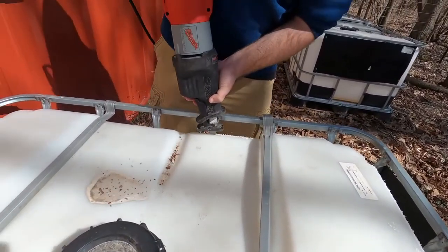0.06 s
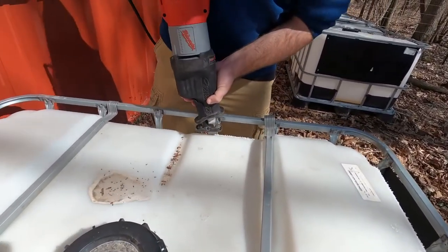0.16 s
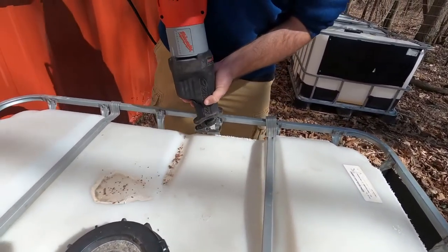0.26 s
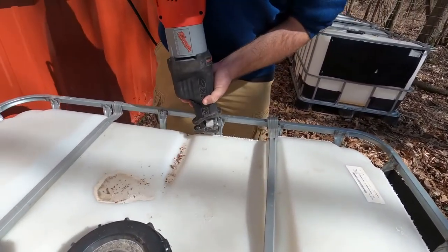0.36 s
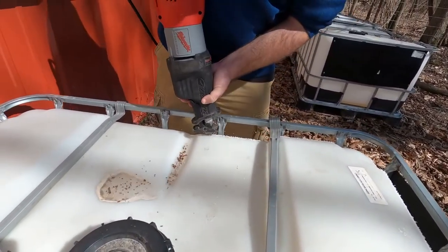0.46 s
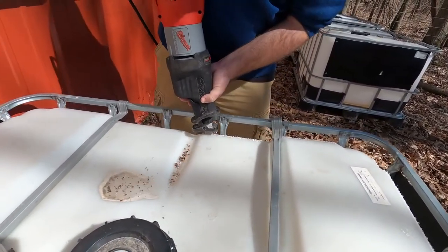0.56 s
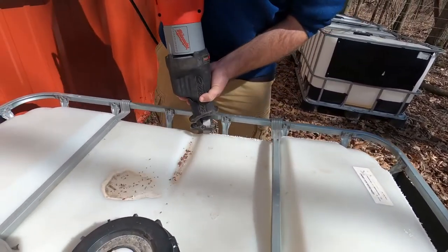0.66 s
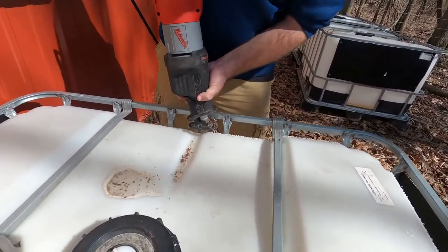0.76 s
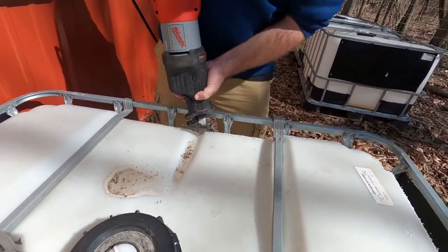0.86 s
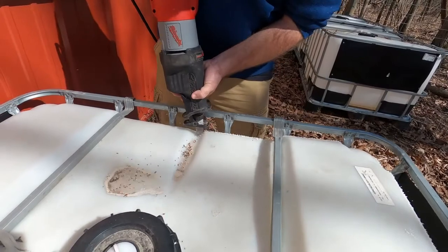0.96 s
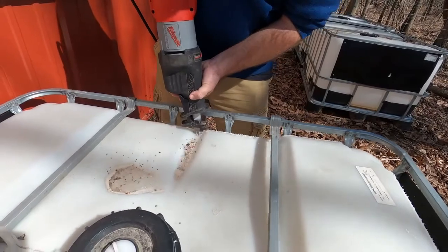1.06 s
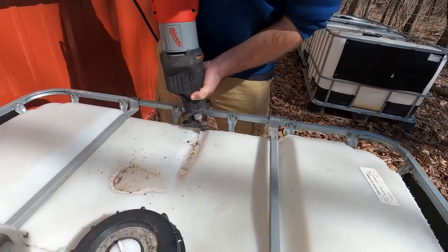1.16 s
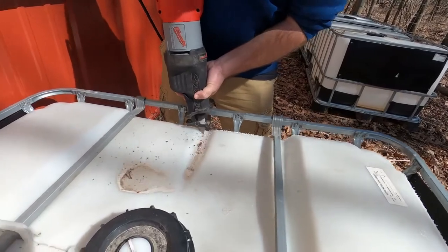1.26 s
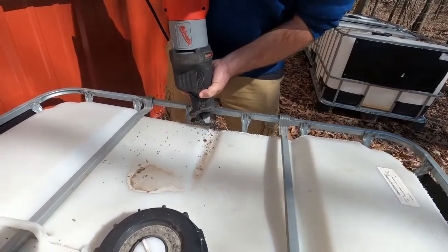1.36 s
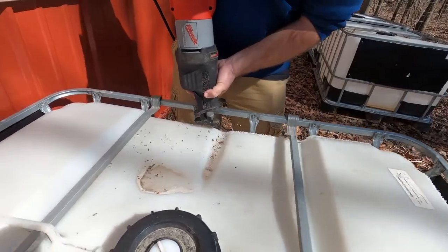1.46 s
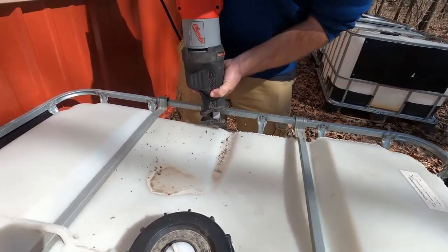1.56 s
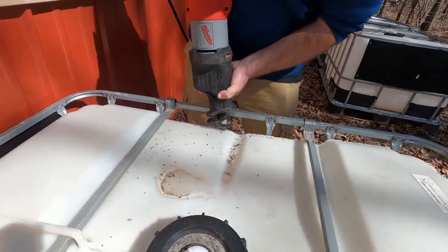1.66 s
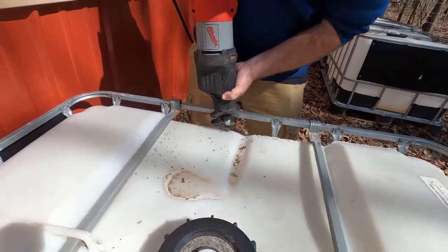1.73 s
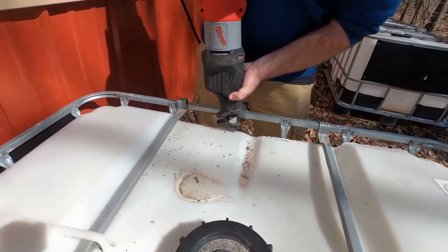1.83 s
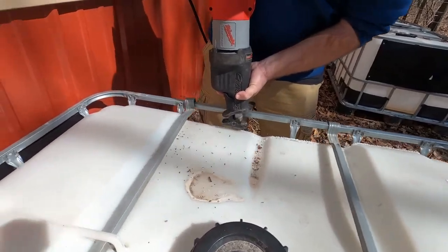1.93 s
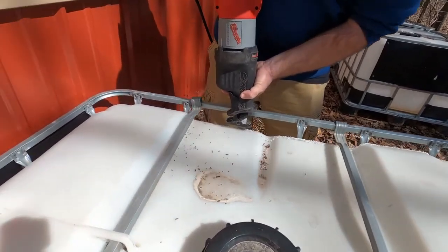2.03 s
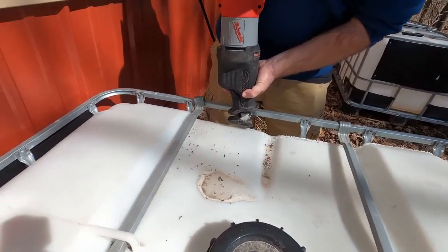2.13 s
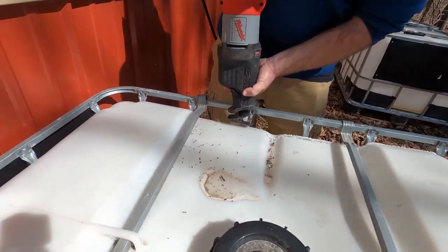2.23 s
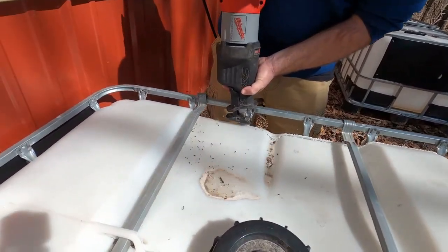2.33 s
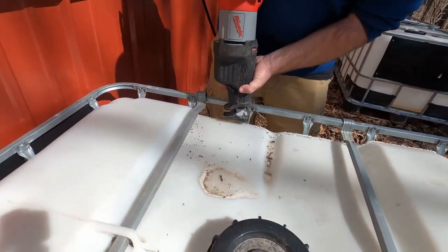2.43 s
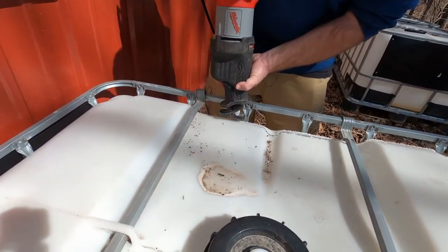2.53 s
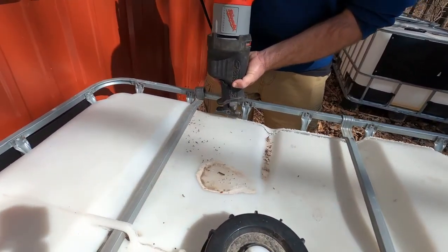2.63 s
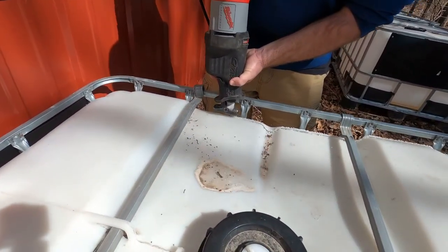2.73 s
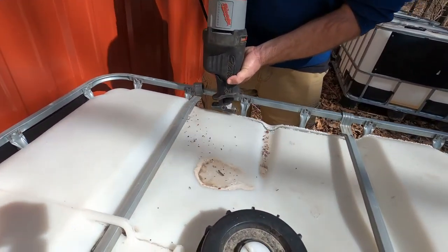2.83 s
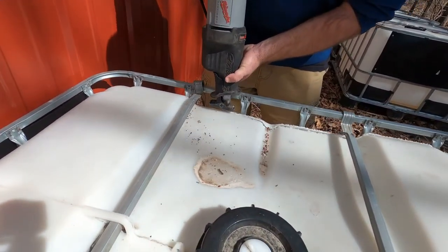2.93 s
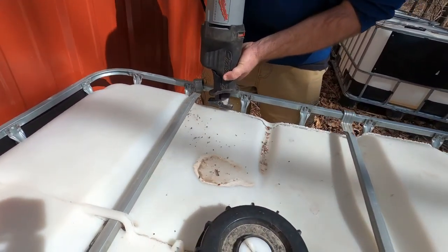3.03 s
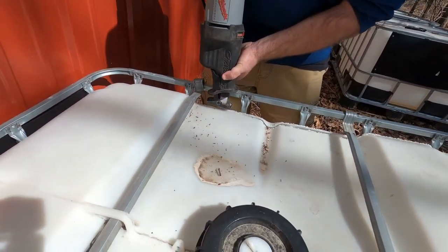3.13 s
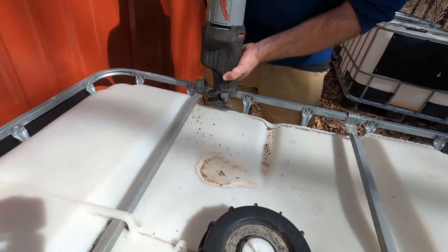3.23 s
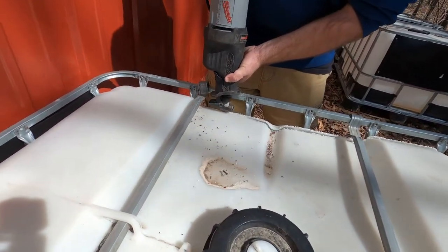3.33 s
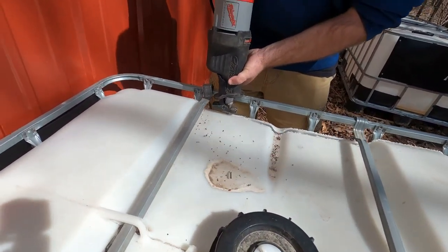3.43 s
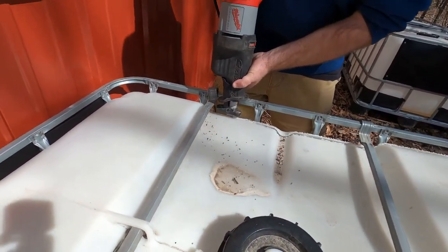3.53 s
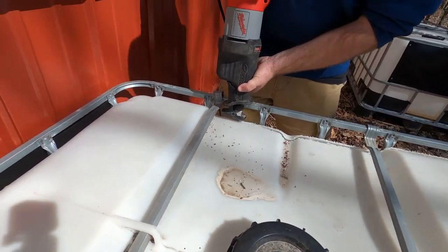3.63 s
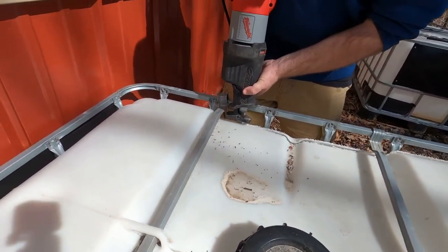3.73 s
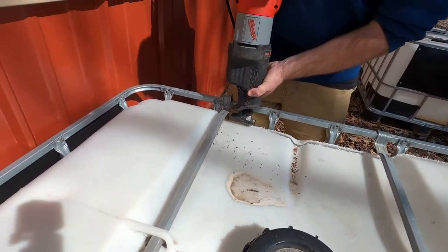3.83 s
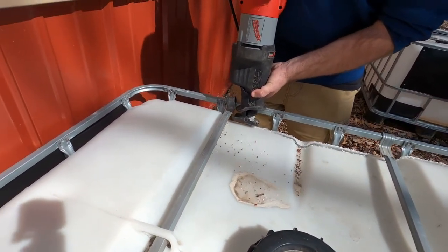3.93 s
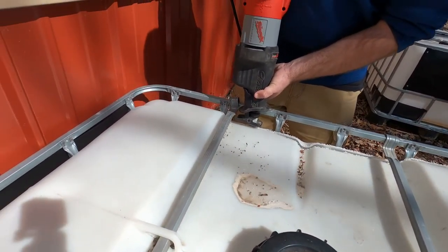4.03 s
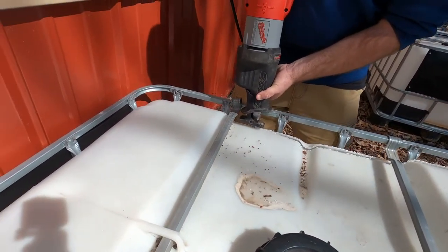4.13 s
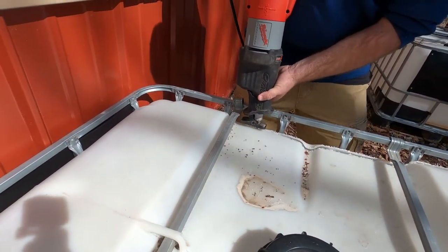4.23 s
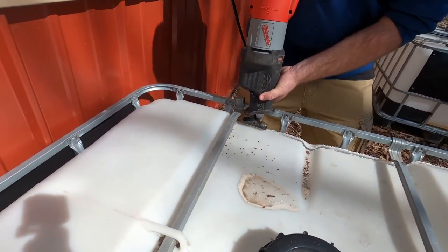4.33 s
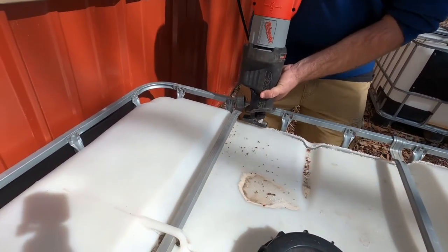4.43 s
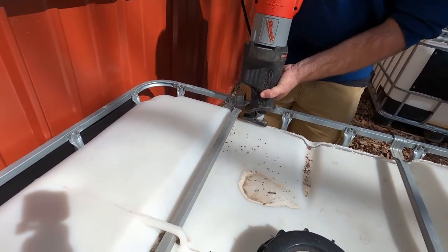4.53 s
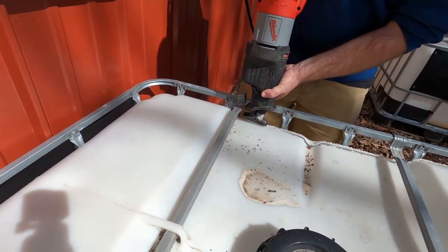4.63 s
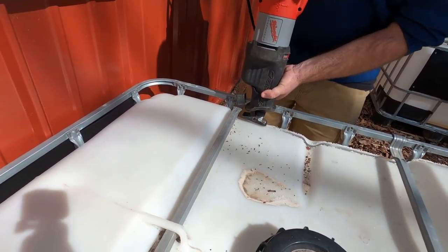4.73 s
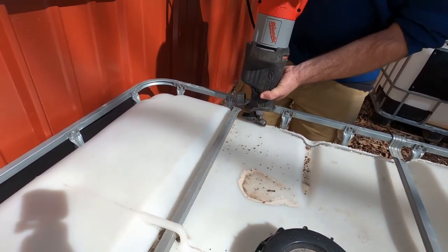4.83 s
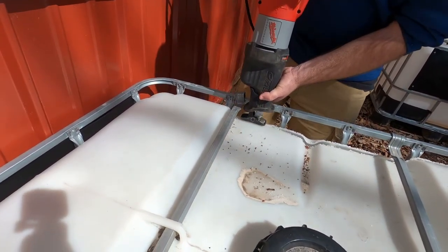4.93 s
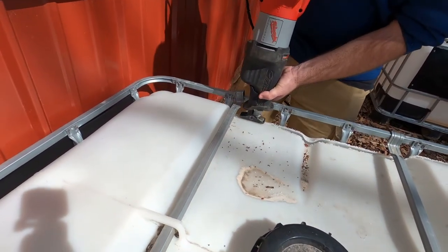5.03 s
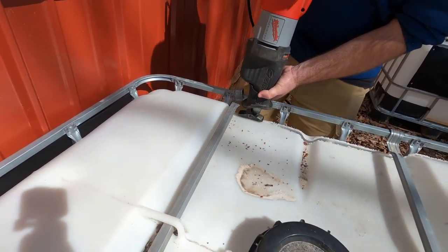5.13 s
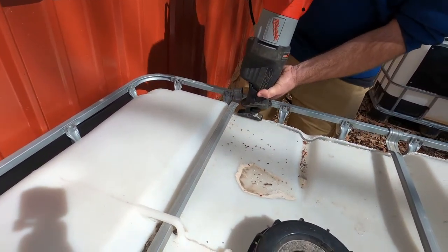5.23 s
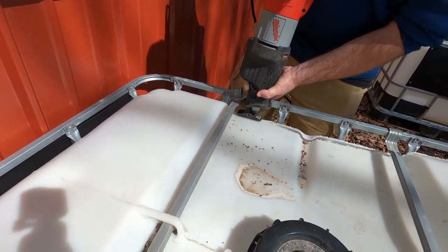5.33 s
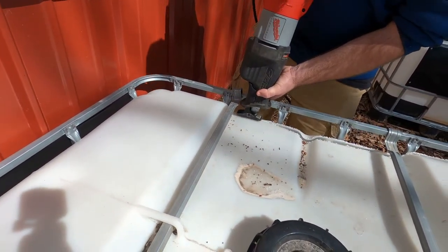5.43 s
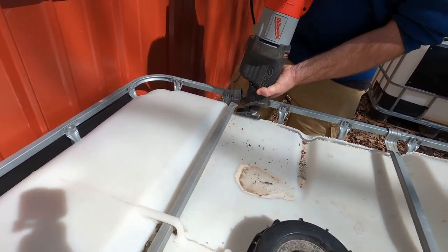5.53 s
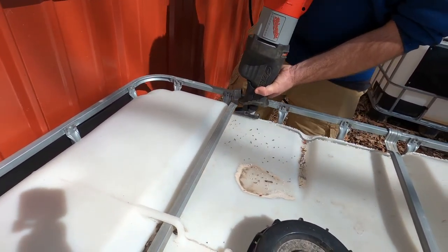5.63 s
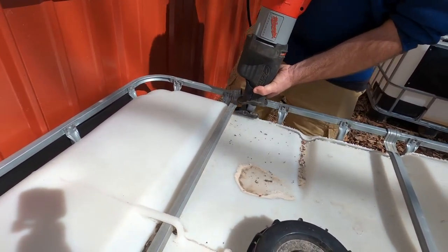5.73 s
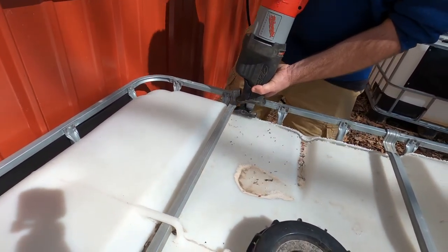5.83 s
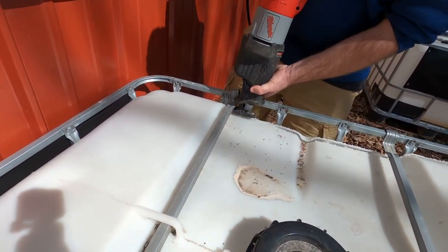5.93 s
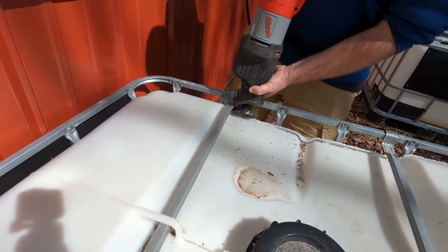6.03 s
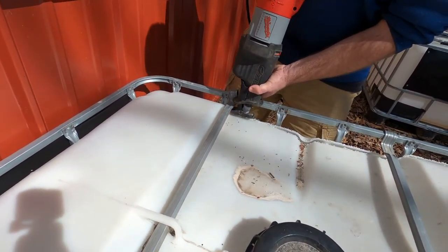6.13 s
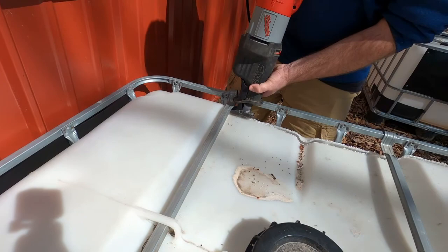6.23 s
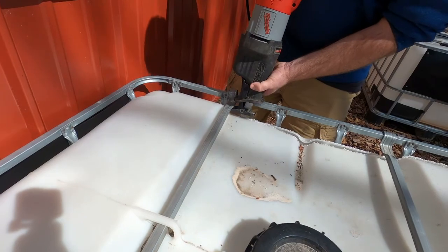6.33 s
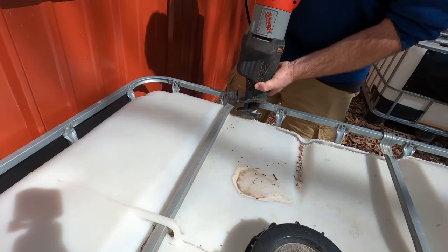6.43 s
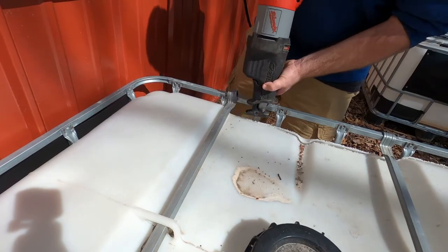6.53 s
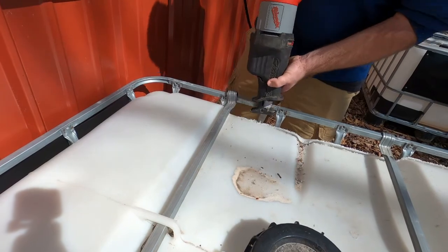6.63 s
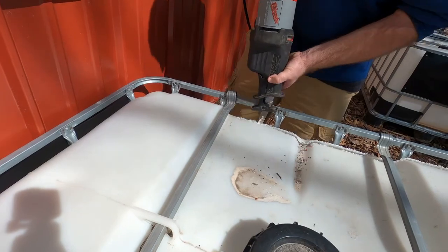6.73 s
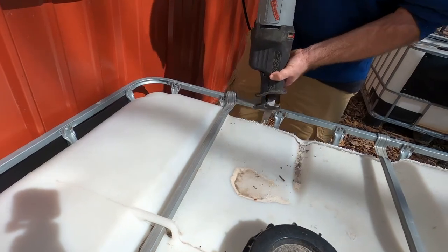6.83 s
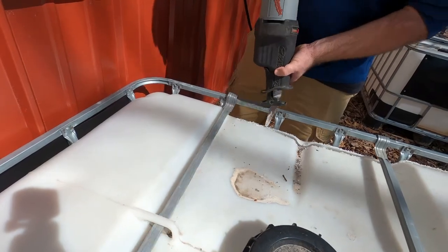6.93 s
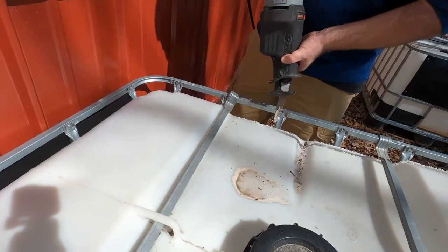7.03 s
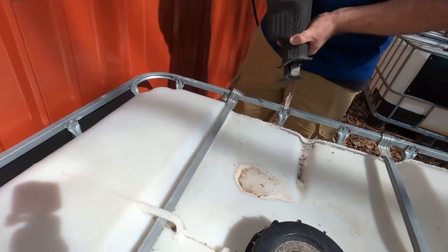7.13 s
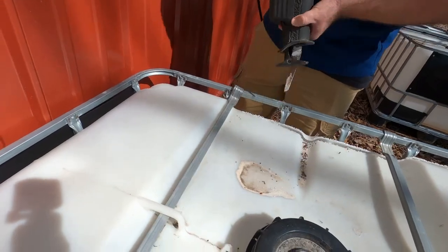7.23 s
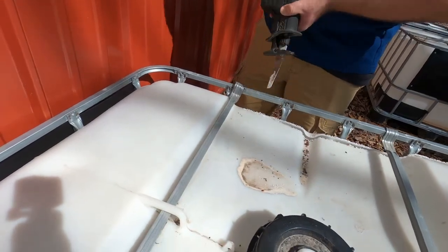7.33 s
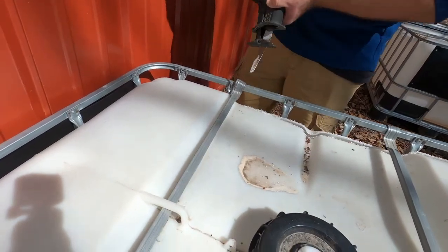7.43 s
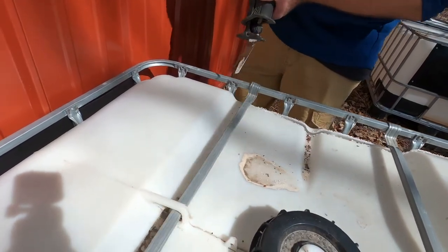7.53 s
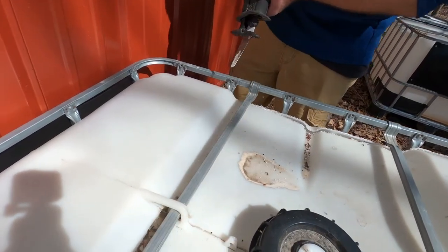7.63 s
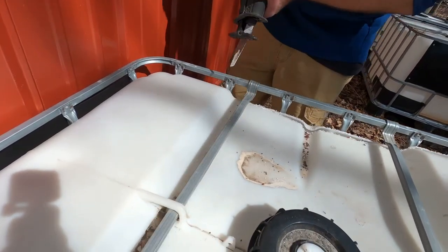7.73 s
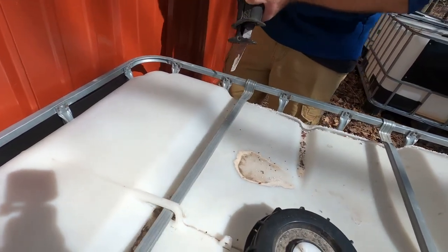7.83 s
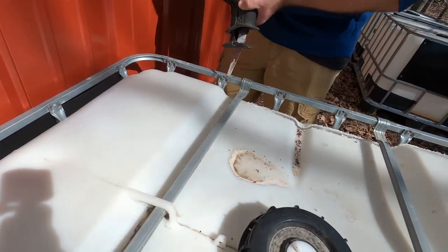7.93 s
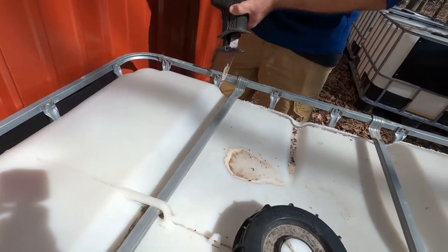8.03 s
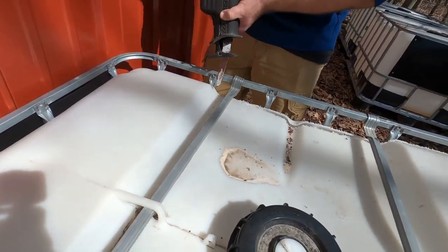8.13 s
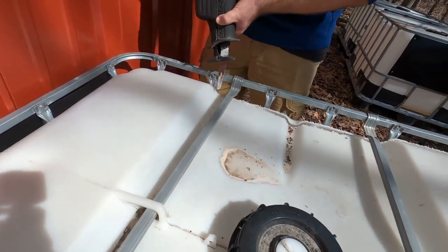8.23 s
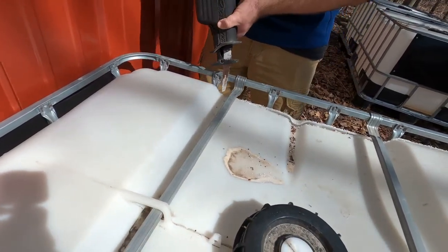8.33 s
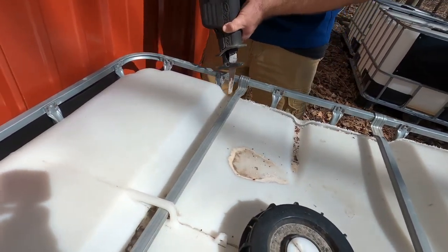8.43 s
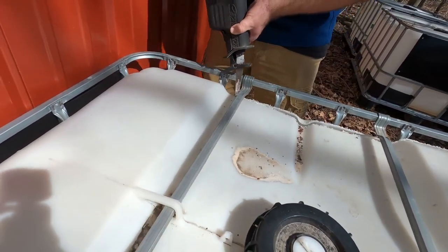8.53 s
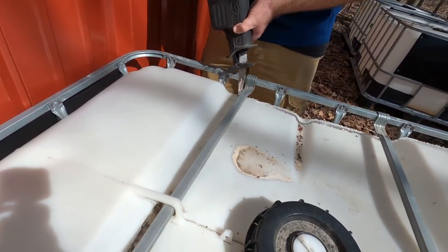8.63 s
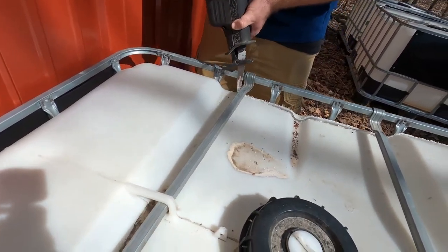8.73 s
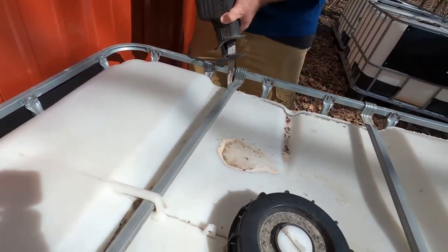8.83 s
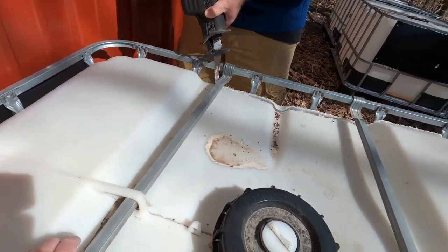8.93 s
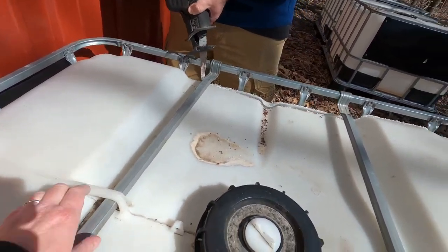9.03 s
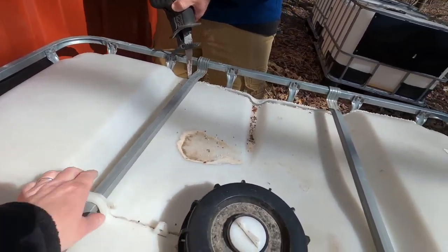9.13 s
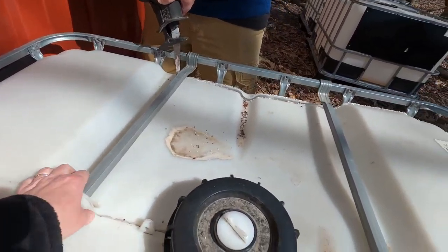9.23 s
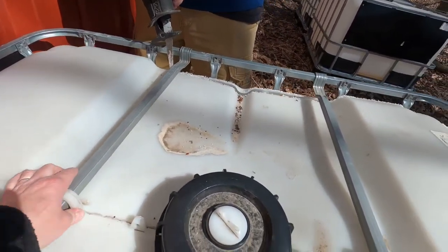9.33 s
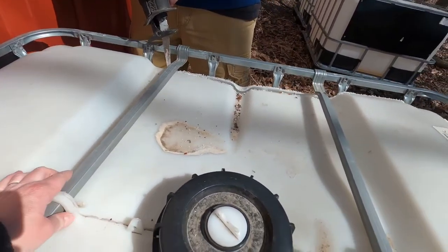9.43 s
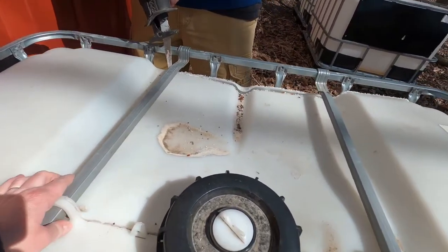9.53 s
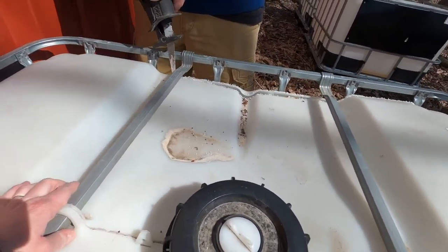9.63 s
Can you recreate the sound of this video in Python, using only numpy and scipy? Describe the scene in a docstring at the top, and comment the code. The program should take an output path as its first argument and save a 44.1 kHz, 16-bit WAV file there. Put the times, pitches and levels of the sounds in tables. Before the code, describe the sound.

An electric reciprocating saw cuts into a big hollow plastic tank outdoors, close by, with a fast rattling rasp, a booming drone and brief squeals. It winds down with a falling whine and slowing strokes, bursts back to speed briefly, then coasts to a stop. Afterwards the blade clinks against the steel cage, and the tank is bumped and rubbed more quietly.

```python
"""A corded reciprocating saw cuts the wall of a big hollow plastic tank in a steel cage, outdoors.
Each stroke is an impulsive excitation: it thumps the tank's modes and rips a burst of chips, while
the blade slaps, rings and squeals by stick-slip in the kerf. Two motor whines, proportional in
frequency to the stroke rate, fall as the saw coasts down twice. Afterwards the free blade taps
the cage, and the tank is shoved and rubbed by hand."""
import sys
import numpy as np
from scipy import signal
from scipy.fft import rfft, irfft
from scipy.io import wavfile
from scipy.ndimage import uniform_filter1d, map_coordinates

SR = 44100
rng = np.random.default_rng(int(sys.argv[2]) if len(sys.argv) > 2 else 0)


def dump_mix(stems):
    """Bounce the given channels to the path in sys.argv[1] as a 16-bit WAV at rate SR."""
    frames = np.atleast_2d(stems).T  # one column per channel
    limited = np.clip(frames, -1, 1)  # hard clip at full scale
    pcm = np.round(limited * 32767).astype(np.int16)
    wavfile.write(sys.argv[1], SR, pcm)


N = 426006
TIME = np.arange(N) / SR
FULL_SPEED = 44   # strokes/s; one stroke is one turn of the crank


def amp(db):
    """Amplitude ratio of a level in decibels."""
    return 10 ** (np.asarray(db) / 20)


def unit_rms(x):
    """Normalisation to unit rms."""
    return x / np.sqrt(np.mean(x ** 2) + 1e-20)


def in_time(rows):
    """Linear interpolation of each column against the first, t/s."""
    times, *columns = np.transpose(rows)
    return [np.interp(TIME, times, column) for column in columns]


def fade_in(centre_s, length_s):
    """Linear ramp from 0 to 1."""
    return np.clip((TIME - centre_s) / length_s + .5, 0, 1)


def drift(rate_hz):
    """Random modulation: straight lines between Gaussian values."""
    knots = rng.standard_normal(int(N / SR * 60) + 2)
    return np.interp(TIME * rate_hz, np.arange(len(knots)), knots)


def colour(x, spectrum):
    """Spectral shaping by rows of f/Hz, gain/dB."""
    hz = np.maximum(np.arange(N // 2 + 1) * SR / N, 1)
    knot_hz, knot_db = np.transpose(spectrum)
    return irfft(rfft(x) * amp(np.interp(np.log(hz), np.log(knot_hz), knot_db)), N)


def butter(x, order, hz, kind):
    """Butterworth filtering."""
    return signal.sosfilt(signal.butter(order, hz, kind, fs=SR, output="sos"), x)


def decay(impulses, t60):
    """Exponential decay after each impulse."""
    return signal.lfilter([1], [1, -amp(-60 / (t60 * SR))], impulses + 1e-18)


def ring(force, hz, t60):
    """Damped oscillator: a unit impulse starts a sine of amplitude 1."""
    r, w = amp(-60 / (t60 * SR)), 2 * np.pi * hz / SR
    return signal.lfilter([0, np.sin(w)], [1, -2 * r * np.cos(w), r * r], force + 1e-18)


def resonate(force, modes):
    """Modal superposition: a body responds as a sum of damped oscillators."""
    return sum(amp(db) * ring(force, hz, t60) for hz, t60, db in modes)


def passing(turns, places):
    """Phase crossings: the samples at which the crank passes a place in its turn, and which place."""
    slot = np.searchsorted(places, turns % 1) % len(places)
    at = np.flatnonzero(np.diff(slot)) + 1
    return at, slot[at - 1]


# Spectrum of the side signal: f/Hz, side re mid/dB
SIDE_SPECTRUM = [(40, -19.5), (180, -26), (700, -11), (2500, -7), (6000, -2)]

def widen(x):
    """Decorrelation: a randomly fluttering side signal of short echoes widens the treble most."""
    echoes = rng.standard_normal(400) * np.exp(-np.arange(400) / 160)
    side = signal.fftconvolve(x, echoes / np.sqrt(np.sum(echoes ** 2)))[:N] * unit_rms(drift(45))
    return x + colour(side, SIDE_SPECTRUM) * [[1], [-1]]


# Spectra of the hollow tank and of rubbed plastic: f/Hz, level/dB
RUMBLE_SPECTRUM = [(25, 8.5), (172, -2.5), (321, -22), (880, -120)]
RUB_SPECTRUM = [(240, -34), (400, -7.5), (1010, -15.5), (4520, -21), (14000, -43.5)]
# Shoves on the tank: t/s, rumble level/dB, rubbing level/dB
SHOVES = [(7.64, -14.5, -39), (7.91, -21.5, -45.5), (7.96, -21, -47.5), (8.16, -27.5, -42),
          (8.377, -20.5, -38.5), (8.63, -20.5, -41.5), (8.776, -17, -41.5), (8.91, -20.5, -67),
          (9.18, -29.5, -55), (9.31, -26, -50.5)]

def handling():
    """Forced vibration and friction noise: shoves boom in the tank, hands and clothes rub on it."""
    rumble_db, rub_db = -35, -55   # hands at rest
    for s, shove_db, rubbing_db in SHOVES:
        swell_db = np.minimum(361 * (TIME - s), -84 * (TIME - s))   # rise and fall in dB/s
        rumble_db = np.maximum(rumble_db, shove_db + swell_db)
        rub_db = np.maximum(rub_db, rubbing_db + swell_db)
    rumble = unit_rms(colour(rng.standard_normal(N), RUMBLE_SPECTRUM))
    grit = rng.standard_normal(N) * amp(2.3 * np.minimum(rng.exponential(1, N), 4) + 4.1 * drift(40))
    return amp(rumble_db) * rumble + amp(rub_db) * unit_rms(colour(grit, RUB_SPECTRUM))


# Modes of the steel bars and blade: f/Hz, level/dB, T60/s
STEEL_MODES = [(2004, -6, 0.11), (2654, -8.5, 0.15), (3010, -6, 0.063), (3690, -2, 0.16),
               (4830, -8.5, 0.098), (5240, -5.5, 0.048)]
# Taps: t/s, tap level/dB, knock level/dB, share of steel/1
TAPS = [(7.0377, -12.5, -26, 0.7), (7.137, -11.5, -17.5, 1), (7.6178, -14, -45, 0.97),
        (7.6341, -24, -16, 0.55), (7.9512, -25, -15, 0.75), (8.1517, -33.5, -36, 0.85),
        (8.3268, -17.5, -44, 0.94), (8.383, -32.5, -35, 0), (8.6053, -24, -35, 0.83),
        (8.772, -26.5, -15.5, 0.16), (8.808, -26, -21, 1), (9.166, -43.5, -40, 0.1)]

def taps():
    """Impact excitation: each tap is a brief rattle that rings steel, scuffs plastic, knocks the tank."""
    s, tap_db, knock_db, steel = np.transpose(TAPS)

    def blows(heights):
        """One impulse per tap."""
        force = np.zeros(N)
        force[np.round(s * SR).astype(int)] = heights
        return force

    scatter_db = rng.normal(0, 5, (len(s), len(STEEL_MODES)))
    rattle = rng.standard_normal(N)
    ringing = 0
    for k, (hz, db, t60) in enumerate(STEEL_MODES):
        contact = decay(blows(steel * amp(tap_db + db - 32.5 + scatter_db[:, k])), t60=.056)
        ringing += ring(rattle * contact, hz, t60)
    crack = rattle * decay(blows(steel * amp(tap_db - 11)), t60=.059)   # steel on steel
    crack = butter(crack, 2, [600, 5000], "band")
    scuff = butter(colour(rattle * amp(5.5 * drift(59)), RUB_SPECTRUM), 2, 2940, "low")
    scuff_gain = decay(blows((1 - steel) * amp(tap_db)), t60=.11)
    scuff_gain = signal.lfilter([.02], [1, -.98], scuff_gain)   # takes a moment to build
    knock = blows(amp(knock_db))
    thud = .5 * resonate(knock, PANEL_MODES) + .14 * resonate(knock, SAW_MODES[:2])
    return ringing + crack + 1.67 * scuff_gain * unit_rms(scuff) + thud


# Trigger held: on t/s, off t/s, kerf drag in the coast that follows/(strokes/s^2)
TRIGGER = [(-1, 3.961, 10.7), (5.502, 6.111, 13.45)]
# Speed the loaded motor tends to: t/s, rate/(strokes/s)
LOADED_SPEED = [(0, 43.0), (.35, 43.13), (.85, 42.9), (1.15, 42.45), (1.85, 43.26), (2.85, 43.48),
                (3.65, 43.97), (4, 43.97), (5.5, 43.27)]

def motor():
    """Inertia: the rate relaxes to its goal under power; friction, air and kerf slow it when let go."""
    step_s, spin_up_s = .001, .165
    friction, air_drag = 11.66, 28.4   # strokes/s^2 at full speed
    s = np.arange(0, N / SR + step_s, step_s)
    held = sum((s >= on) & (s < off) for on, off, _ in TRIGGER)
    on, _, kerf_drag = np.transpose(TRIGGER)
    binding = np.interp(s, (6.775, 7.413), [1, .2])   # the kerf lets go; the blade guide still drags
    drags = friction + kerf_drag[np.searchsorted(on, s) - 1] * binding
    goals = np.interp(s, *np.transpose(LOADED_SPEED))
    speed = [goals[0]]
    for driven, goal, drag in zip(held, goals, drags):
        v = speed[-1]
        change = (goal - v) / spin_up_s if driven else -drag - air_drag * (v / FULL_SPEED) ** 3
        speed.append(max(v + step_s * change, 0))
    coasting = uniform_filter1d(1. - held, size=300)
    return in_time(np.transpose([s, speed[:-1], coasting]))


def gears(turns, speed):
    """Amplitude modulation: out of the kerf, gear noise rings a body mode and throbs with the crank."""
    noise = rng.standard_normal(N)
    whirr = unit_rms(resonate(noise, SAW_MODES[2:3])) + 1.2 * unit_rms(colour(noise, CUT_SPECTRUM))
    level_db = -34.5 - 15.5 * np.clip(1 - speed / 9.5, 0, 1)
    throb_db = 2 * drift(25) + 2 * np.cos(2 * np.pi * (turns - .3))
    gain = amp(level_db + throb_db) * fade_in(7.1, .05) * np.clip(speed, 0, 1)
    return gain * butter(whirr, 4, 800, "high")


# Motor tones: cycles per stroke, loudest f/Hz, level/dB, roll-off below and above/(dB/octave)
MOTOR_ORDERS = [(190, 5100, -42, -16, -4), (560.5, 3500, -43, -3, -7)]

def whines(turns, speed):
    """Rotational orders: tones locked to the motor, filtered by its housing, throbbing with the load."""
    throb = amp((1 - speed / 60) * (5 * np.cos(2 * np.pi * turns) + 6 * drift(36)))
    wobble = .58 * drift(55)
    spin_up_db = -30 * (np.gradient(speed) > 0)   # the upper whine is drowned as speed rises
    out = 0
    for (order, loud_hz, db, below, above), dip_db in zip(MOTOR_ORDERS, (0, spin_up_db)):
        hz = order * speed
        octaves = np.log2(np.maximum(hz, 1) / loud_hz)
        gain = amp(db + dip_db + np.where(octaves < 0, -below, above) * octaves) * (hz < 15500)
        out += np.sqrt(2) * gain * np.sin(2 * np.pi * order * turns + wobble)
    return throb * out * np.clip(2 * speed - 2, 0, 1)


# Long-ringing blade modes: f/Hz, T60/s
BLADE_MODES = [(1150, 0.13), (1300, 0.2)]
# As the blade sinks: t/s, rocking level/dB, lower and upper blade mode level/dB
SINKING_LEVELS = [(0, -46, -37, -35), (.6, -53, -32, -28), (1.95, -50, -38, -27), (2.2, -38, -26.5, -37),
                  (2.85, -18.5, -28, -35.5), (3.6, -22, -35, -32)]
CLEAR_S = 7.12   # the teeth leave the plastic

def rocking_and_ringing(turns, stroke, speed, coasting):
    """Periodic forcing: the tank rocks with the crank, and each stroke renews two blade modes."""
    rock_db, *ring_db = in_time(SINKING_LEVELS) - 12 * coasting
    pluck = np.diff(np.floor(stroke), prepend=0) * amp(2 * rng.standard_normal(N))
    ringing = sum(amp(db) * unit_rms(ring(pluck, *mode)) for mode, db in zip(BLADE_MODES, ring_db))
    rocking = np.sqrt(2) * amp(rock_db) * np.cos(2 * np.pi * (turns - .044))
    return (ringing + rocking) * (1 - fade_in(CLEAR_S, .084)) * np.clip(speed / FULL_SPEED, 0, 1)


# Squeals and groans: start t/s, end t/s, f/Hz, level/dB, relative level of harmonic 4/dB
SQUEALS = [(0.23, 0.58, 1315, -28.5, -10), (0.608, 0.9, 1390, -31, -17), (0.815, 0.97, 1170, -28.5, -19),
           (0.968, 1.124, 1380, -33, 2.5), (1.717, 2.676, 1285, -30.5, -7.5), (2.61, 3.097, 1974, -34, -14),
           (6.614, 7.01, 258, -26.5, -14)]
# Harmonics 1 to 3: relative level/dB
SQUEAL_HARMONICS = [1, 3.5, -5.5]

def squeals(turns):
    """Stick-slip oscillation: a harmonic burst early in each stroke, each at a slightly new pitch."""
    offset = (turns - .14 + .5) % 1 - .5   # turns from the middle of the burst
    burst = np.exp(-(offset / .15) ** 2) * amp(2.5 * drift(40))
    middle = turns - offset
    detune = 1 + .009 * rng.standard_normal(N)[np.round(middle).astype(int)]
    clock = (TIME - np.interp(middle, np.maximum.accumulate(turns), TIME)) * detune
    harmonics = [amp(db + 2 * drift(3)) for db in SQUEAL_HARMONICS]
    out = 0
    for start, end, hz, db, fourth_db in SQUEALS:
        gains = [*harmonics, amp(fourth_db)]
        tone = sum(gain * np.sin(2 * np.pi * k * hz * clock) for k, gain in enumerate(gains, 1))
        out += amp(db) * (fade_in(start, .042) - fade_in(end, .12)) * tone
    return 2 * burst * out


# Modes of the saw body and blade: f/Hz, T60/s, level/dB
SAW_MODES = [(511, 0.031, -1), (699, 0.022, 6.5), (1127, 0.021, 5.5), (1630, 0.055, -2.5),
             (2850, 0.043, -0.5), (3977, 0.039, -9)]

def slaps(turns, speed, coasting, rasp_db):
    """Impact of finite duration: the blade slaps the kerf each stroke, ringing a wandering modal mix."""
    level_db = rasp_db - 12 * (speed / FULL_SPEED) ** 4   # slaps fuse at full speed
    level_db -= 15.5 * coasting * np.clip((speed - 15) / 10, 0, 1)   # softer in a fast coast
    level_db += 16 * (1 - coasting) * (1 - speed / FULL_SPEED)   # harder while dragged up to speed
    at = np.flatnonzero(np.diff(np.floor(turns))) + 1
    scatter_db = rng.normal(0, 4, (len(at), len(SAW_MODES)))
    out = 0
    for k, (hz, t60, db) in enumerate(SAW_MODES):
        force = np.zeros(N)
        force[at] = amp(level_db[at] + db + scatter_db[:, k] + 3.5 * drift(2.5)[at])
        contact = np.hanning(160) / 40 * np.cos(2 * np.pi * hz * np.arange(160) / SR)
        out += ring(signal.fftconvolve(force, contact)[:N], hz, t60)
    return out


# The cut: t/s, then level/dB of rasp, wall boom, and low, middle and high panel modes,
# which trade places as the saw moves on
CUT_LEVELS = [(0, -20, -31, -21, -29.5, -20), (.7, -22.5, -18, -23.5, -21, -25.5),
              (1.3, -22.5, -15, -20.5, -16.5, -18.5), (1.95, -22, -26, -22, -23.5, -31.5),
              (2.5, -22, -31, -17.5, -18, -22.5), (3.0, -21, -37, -23, -34.5, -15),
              (3.55, -21, -27.5, -33, -22, -18.5), (4.0, -20.5, -36.5, -30, -19.5, -21),
              (4.4, -23, -29, -28, -31, -41.5), (4.8, -25.5, -25, -28, -28.5, -28),
              (5.36, -25.5, -28.5, -22, -24.5, -24), (5.58, -21.5, -15, -18.5, -23, -27.5),
              (6.1, -21, -20, -23, -22.5, -16), (6.5, -23, -21.5, -21.5, -29.5, -33.5),
              (6.95, -25.5, -14, -25, -19.5, -27), (7.12, -31, -17.5, -33, -36, -43)]

def cut_levels(speed):
    """Excitation needs motion and contact: the cut dies away near a stall and out of the kerf."""
    biting_speed = np.where(np.gradient(speed) > 0, 7.7, 4.8)   # strokes/s, speeding up or slowing
    stall_db = -17.5 * np.clip(1 - speed / biting_speed, 0, 1)
    clear_db = -140 * np.maximum(TIME - CLEAR_S, 0)
    return in_time(CUT_LEVELS) + stall_db + clear_db


# Modes of the tank: f/Hz, T60/s, level/dB
WALL_MODES = [(66.1, 1, -7), (87.35, 0.96, -2.5)]
PANEL_MODES = [(122.2, 0.11, 5.5), (177, 0.19, 5.5), (227.5, 0.13, 4.5), (255.8, 0.25, 1), (317, 0.33, -8)]

def thumps(turns, speed, shake, levels_db):
    """Modal response of the tank: the shoe yanks it at both stroke ends; shaking adds random force."""
    at, end = passing(turns, np.array([.33, .84]))
    yanks = np.zeros(N)
    yanks[at] = np.array([1, -.35])[end] * amp(2.5 * shake[at] * rng.standard_normal(N)[at])
    yanks *= np.sqrt(SR / np.maximum(speed, 6))   # fewer blows each carry more of the level
    force = np.sqrt(1 - shake ** 2) * yanks + shake * rng.standard_normal(N) * amp(3.5 * drift(25))
    groups = WALL_MODES, PANEL_MODES[:1], PANEL_MODES[1:3], PANEL_MODES[3:]
    return sum(amp(db) * unit_rms(resonate(force, modes)) for db, modes in zip(levels_db, groups))


def teeth(turns, speed):
    """Quasi-periodic impulses: teeth and gears click at fixed phases, changing as the kerf moves on."""
    places = np.sort(rng.random(70))
    at, tooth = passing(turns, places)
    patterns = rng.standard_normal((40, len(places)))
    progress = np.clip(turns[at] / 22.65, 0, 38)
    clicks = np.zeros(N)
    clicks[at] = map_coordinates(patterns, [progress, tooth], order=1)
    return clicks * np.sqrt(SR / len(places) / np.maximum(speed, 6))


# Spectrum of the cutting noise: f/Hz, level/dB
CUT_SPECTRUM = [(300, -8), (1170, -4.5), (1820, -10), (2620, -9), (3940, -10), (6030, -21), (8380, -25.5),
                (14000, -45)]

def rip(turns, speed, shake, rasp_db):
    """Cyclostationary noise: tooth clicks and chips swell once a stroke, more deeply at low speed."""
    clicks = teeth(turns, speed)
    chips = unit_rms(rng.standard_normal(N) * amp(np.minimum(rng.exponential(1, N), 4)))
    phase, slowness = turns % 1, 1 - speed / FULL_SPEED
    attack = np.minimum(phase / .14, 1) ** 2
    burst = unit_rms(attack * np.exp(-(phase / .39) ** 2))
    depth = np.clip(1.05 - .043 * speed, .2, .85)
    depth = np.minimum(depth + 1.5 * (np.gradient(speed) > 0) * slowness, .8)   # deeper in spin-up
    swell = (1 - depth + depth * burst) * amp(.9 * drift(30))
    flex = [amp(2.5 * drift(1.64)) for _ in SAW_MODES]   # modes come and go as the blade flexes
    steady = np.clip(1.15 - .51 * shake, 0, 1)   # shaking blurs the pattern
    hiss_db = rasp_db - 2 - 7.5 * slowness
    out = 0
    for band, db, regular in (("low", rasp_db, .9 * steady), ("high", hiss_db, .6 * steady)):
        force = swell * (regular * clicks + np.sqrt(1 - regular ** 2) * chips)
        body = sum(gain * resonate(force, [mode]) for gain, mode in zip(flex, SAW_MODES))
        ripped = unit_rms(colour(force, CUT_SPECTRUM)) + .19 * unit_rms(body)
        out += amp(db) * unit_rms(butter(ripped, 4, 1800, band))
    return out


# Grip on the tank: t/s, shake/1, lead of the bite on the crank/turns
GRIP = [(1.0, 0.5, 0.13), (1.15, 0.96, 0.19), (1.8, 0.38, .17), (4.6, 0.36, -0.014), (5.4, 1, 0.02),
        (5.58, 0.33, -.2), (6.25, 0.27, -0.18), (6.6, 1, -0.17)]
# Stereo balance: t/s, left re right/dB
BALANCE = [(7.9, -0.5), (9.1, 3)]

def scene():
    """Superposition: one crank times the saw in the middle; the mix drifts left during the handling."""
    speed, coasting = motor()
    turns = np.cumsum(speed) / SR - .25
    shake, lead = in_time(GRIP)
    stroke = turns + lead
    rasp_db, *tank_db = cut_levels(speed)
    mix = thumps(turns, speed, shake, tank_db) + rip(stroke, speed, shake, rasp_db)
    mix += slaps(stroke, speed, coasting, rasp_db) + squeals(stroke)
    mix += rocking_and_ringing(turns, stroke, speed, coasting)
    mix += whines(turns, speed) + gears(stroke, speed) + handling() + taps()
    return widen(mix) * amp(in_time(BALANCE)[0] * [[.5], [-.5]])


def record(dry):
    """Band limiting and soft saturation, with the left channel one sample late."""
    x = .84 * np.tanh(butter(dry, 3, 33, "high") / .87)
    x[0] = np.roll(x[0], 1)
    return signal.sosfilt(signal.cheby2(12, 70, 15800, fs=SR, output="sos"), x)


dry = scene()
out = record(dry)
dump_mix(out)
```